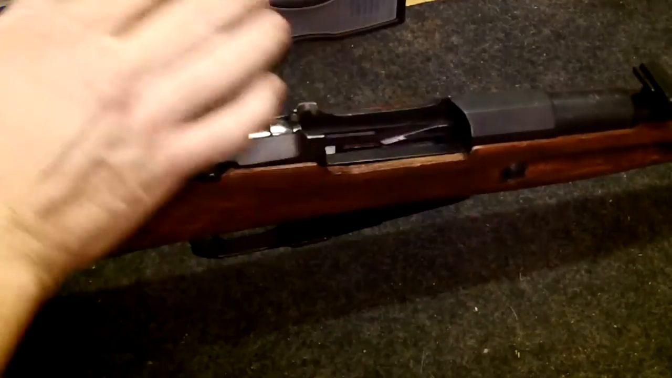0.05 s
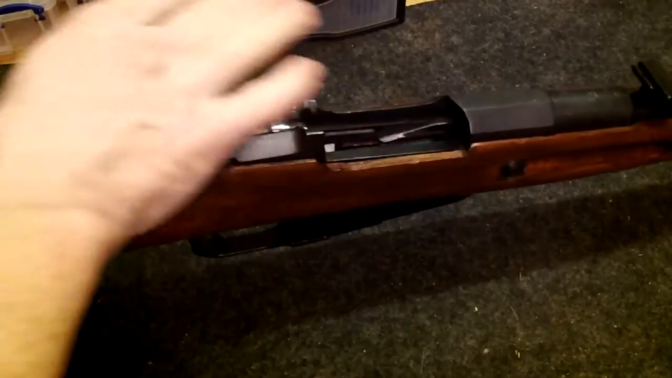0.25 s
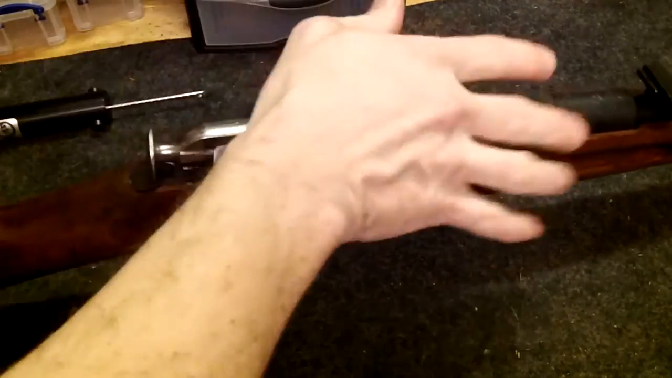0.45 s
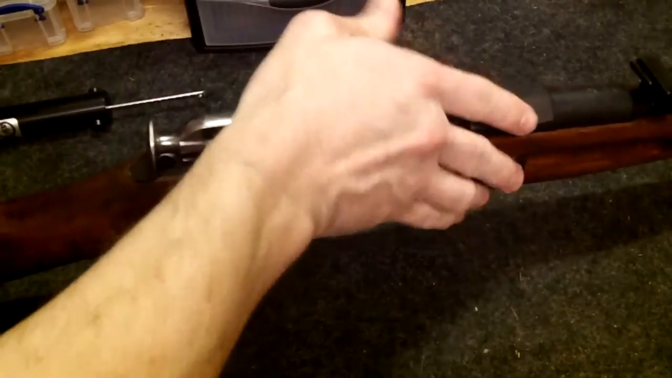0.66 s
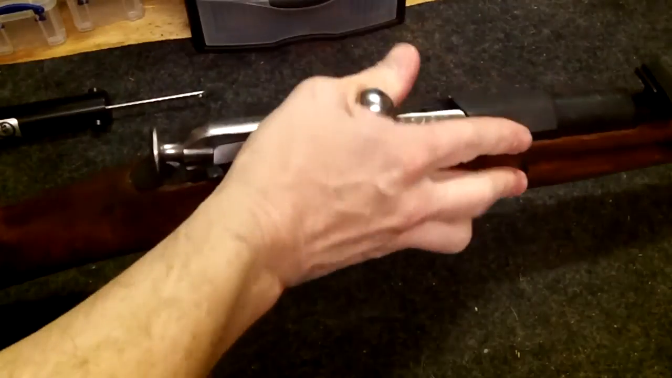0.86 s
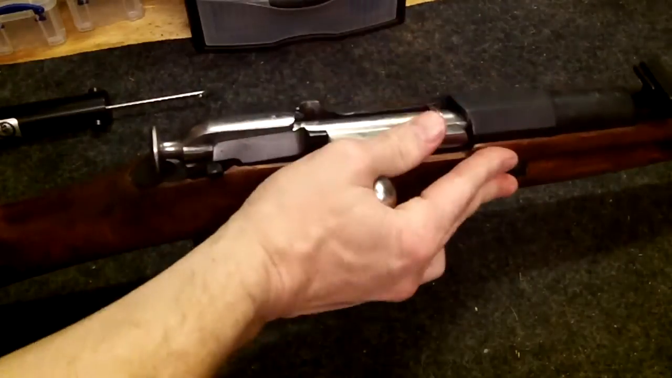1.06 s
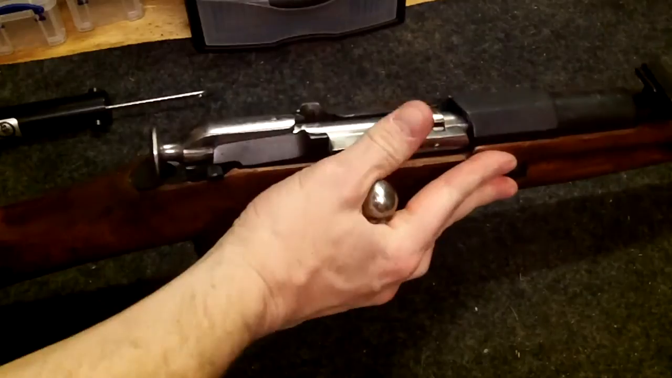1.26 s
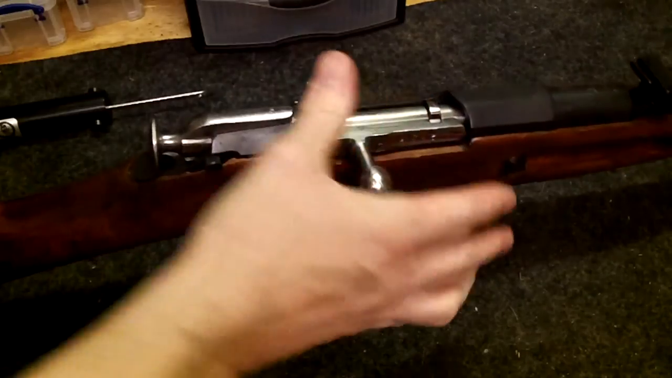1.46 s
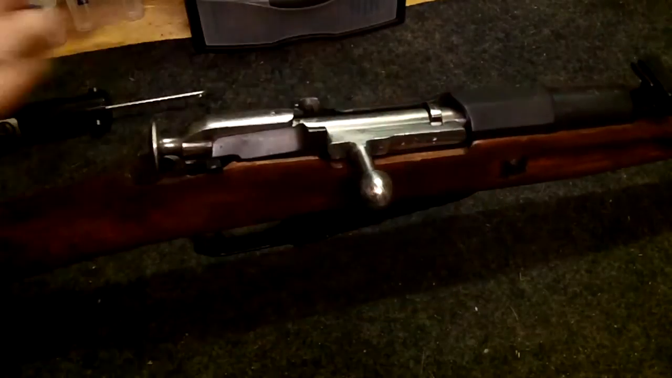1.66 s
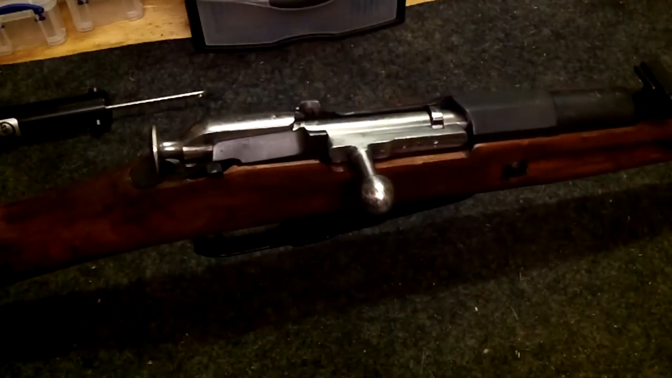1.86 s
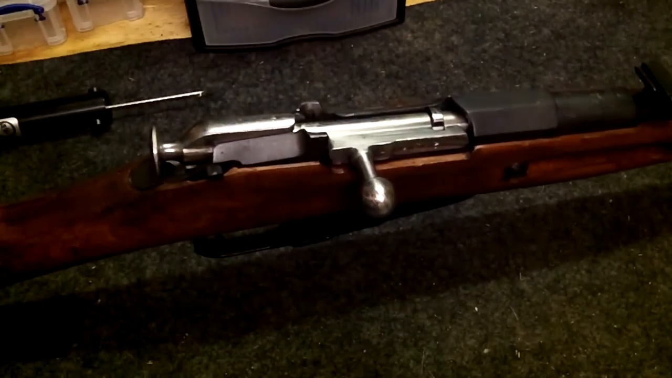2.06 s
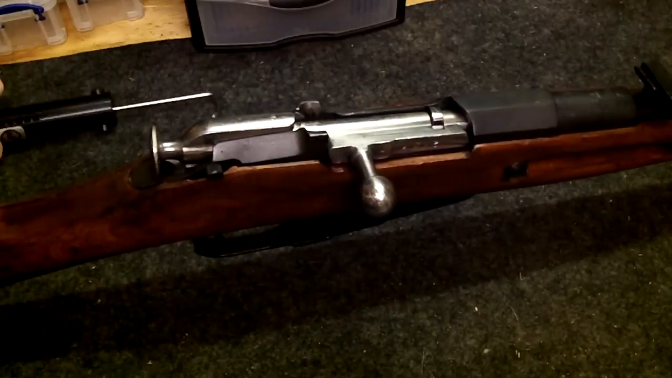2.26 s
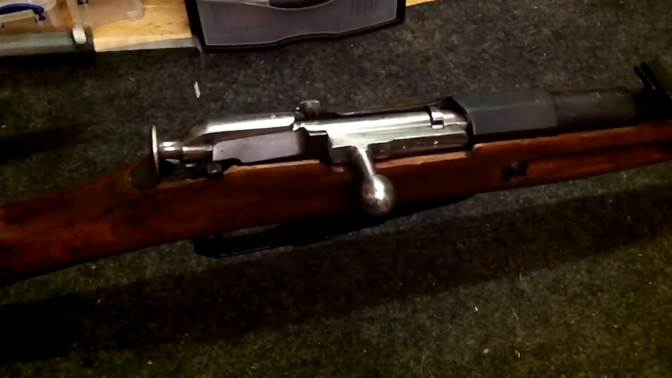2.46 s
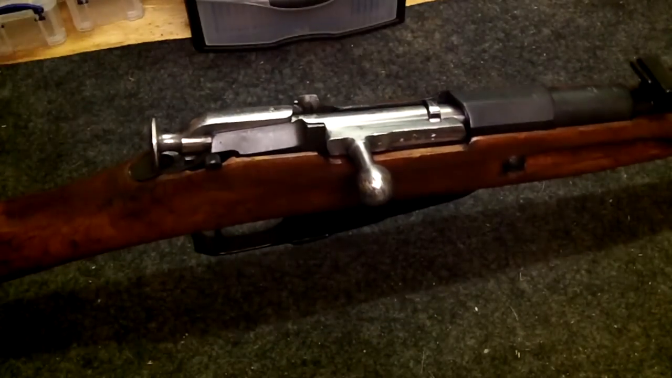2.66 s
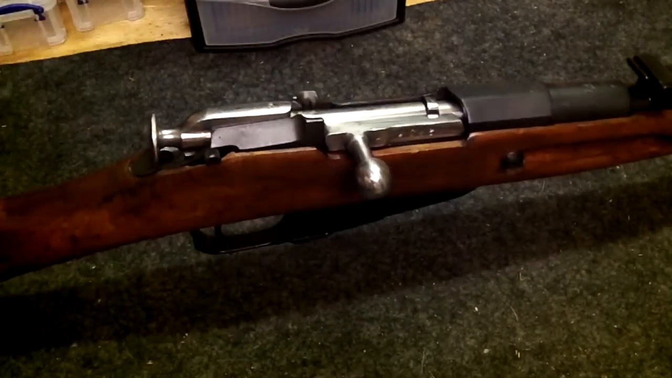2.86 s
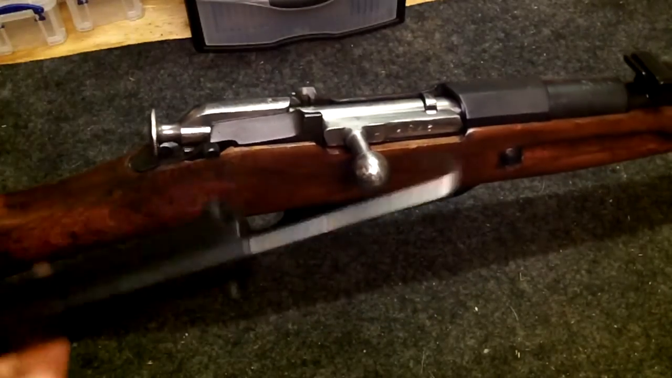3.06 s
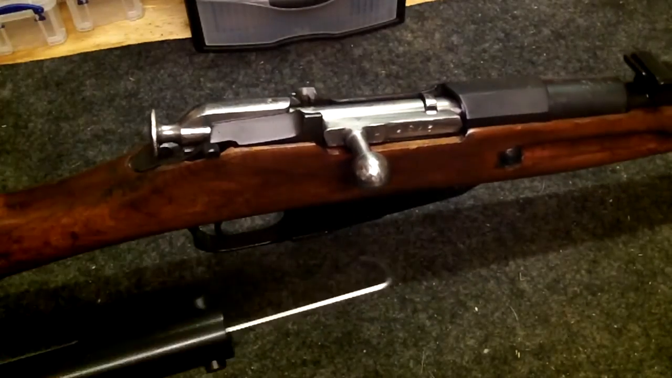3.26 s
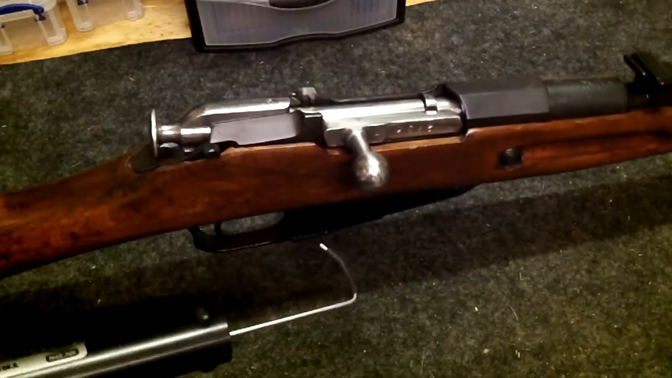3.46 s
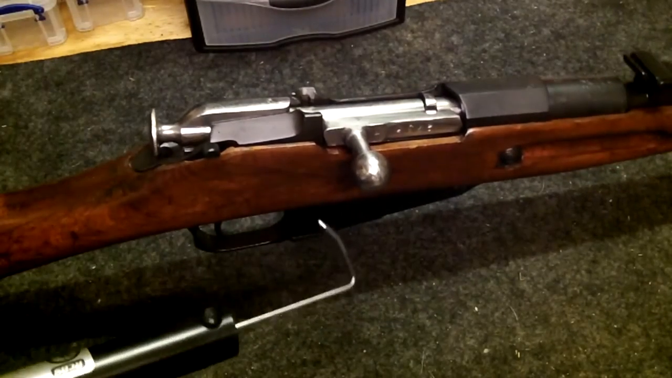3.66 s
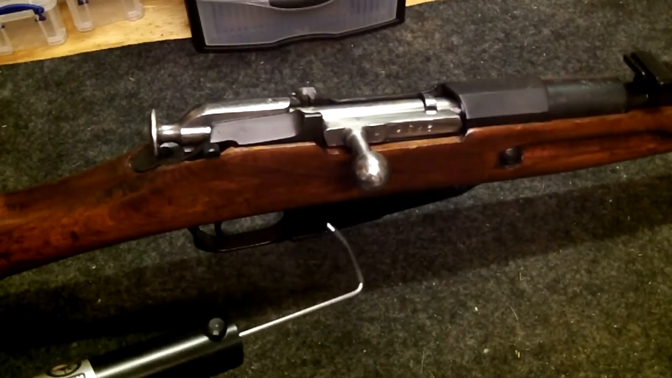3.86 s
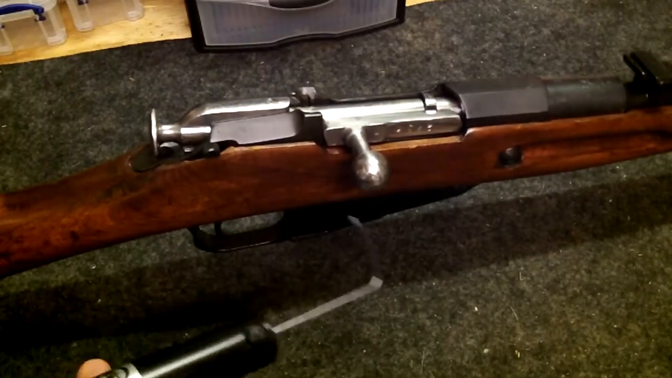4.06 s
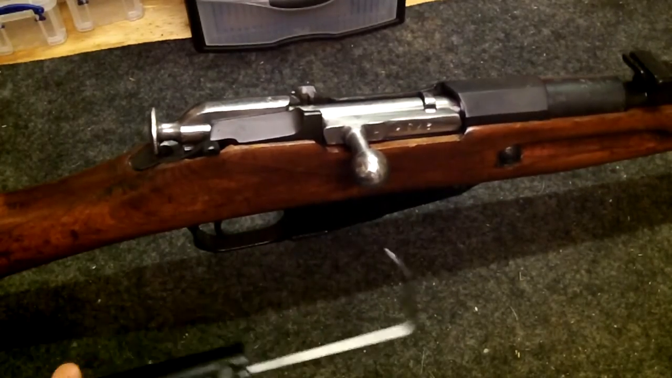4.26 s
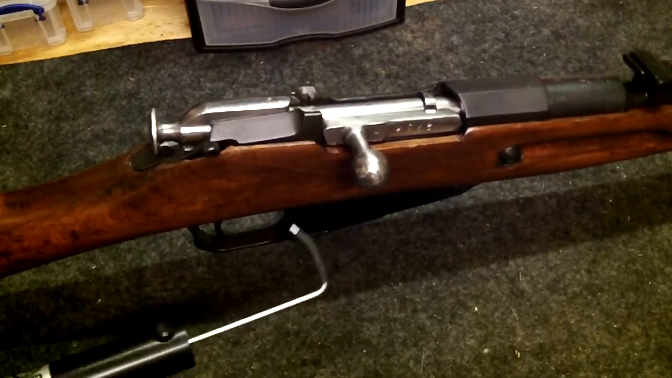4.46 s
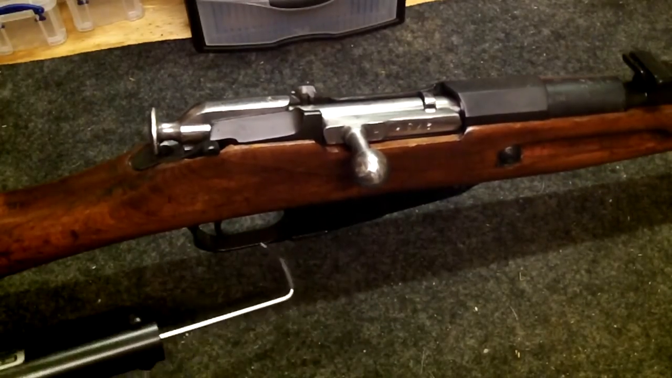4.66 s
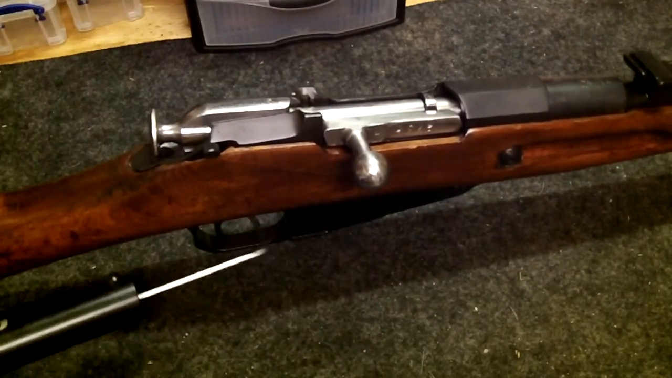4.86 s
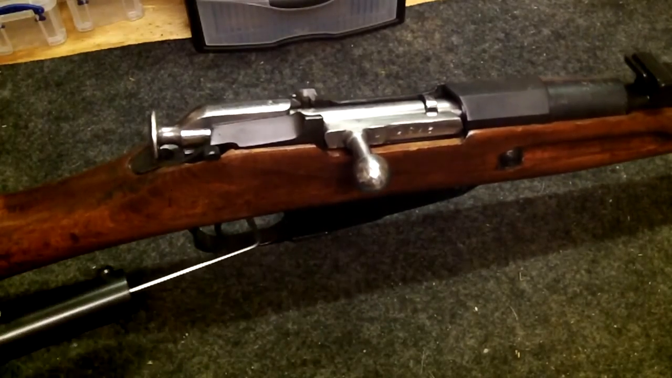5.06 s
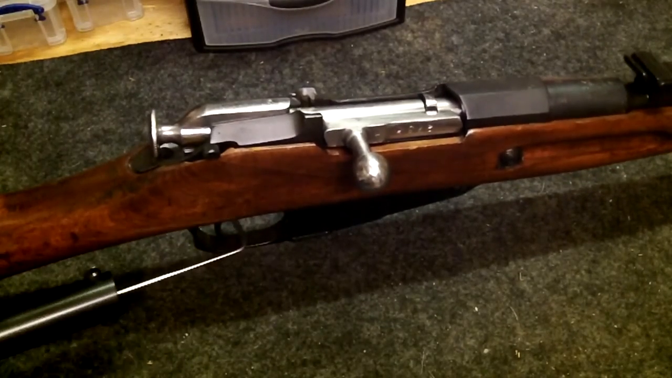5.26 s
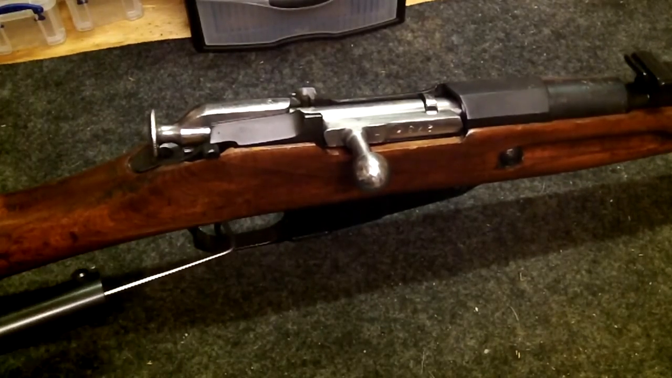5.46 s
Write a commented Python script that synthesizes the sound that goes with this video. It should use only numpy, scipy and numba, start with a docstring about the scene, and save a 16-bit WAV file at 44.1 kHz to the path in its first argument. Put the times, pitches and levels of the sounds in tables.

```python
"""Rifle bolt pushed home on a bench, small room

A small recorder sits close to a felt-covered bench while a rifle bolt is pushed home in strokes and turned down.
Steel scrapes as bunched ticks, and chatters and slams as noise cracks over ringing modes, thumping the wooden stock.
Then a trigger gauge: its slider knocks and bounces, and its wire hook rubs and taps the trigger guard.
The slams overload the recorder, whose limiter ducks and lets the room swell back over hiss and a low bench shudder."""
import sys
import numpy as np
from scipy import signal
from scipy.fft import rfft, irfft, next_fast_len
from scipy.io import wavfile
from numba import njit

SR = 44100
rng = np.random.default_rng(int(sys.argv[2]) if len(sys.argv) > 2 else 0)


def int16_out(signal):
    """Quantize to a 16-bit WAV file."""
    q = np.round(np.clip(np.atleast_2d(signal).T, -1, 1) * 32767)
    wavfile.write(sys.argv[1], SR, q.astype(np.int16))


N = 243431
TIME = np.arange(N) / SR
RING_TIME = TIME[:SR // 4]

# All event levels are relative, ahead of the recorder's limiter; pitch_hz is the pitch each contact favours.
# bolt slamming against a stop: start_s [s], level_db [dB], crack_t60_s [s], pitch_hz [Hz], focus_db [dB]
SLAMS = [(0.3788, -1.5, 0.018, 4020, 7), (0.508, 16, 0.039, 5400, 5), (0.78, 19.5, 0.024, 3930, 4.5),
         (1.0763, 0.5, 0.013, 3540, 14), (1.0997, 2, 0.017, 3740, 3.5)]
# loose bolt chattering against the receiver: start_s [s], level_db [dB], pitch_hz [Hz]
CHATTER = [(0.3228, -18.5, 2490), (0.355, -12.5, 2850), (0.3566, -16, 4150), (0.3634, -5, 5940),
           (0.3998, -14.5, 3400), (0.4199, -11, 2600), (0.4344, -13.5, 3500), (0.4398, -9, 3900),
           (.446, -7.5, 3800), (0.4548, -17, 3580), (0.4747, -11.5, 3330), (0.481, -16, 4200),
           (.725, -31.5, 3000), (.759, -22, 3120), (0.7689, -10, 2360), (1.034, -30, 2900),
           (1.041, -28, 2920), (1.051, -20.5, 2200), (1.438, -40, 2500)]
# hand moving the bolt along its raceway: start_s [s], end_s [s], level_db [dB]
BOLT_STROKES = [(0, .35, -51), (.355, .508, -27.5), (.757, .78, -20.5), (1.046, 1.1, -25.5)]
# stock jolted against the bench: start_s [s], level_db [dB], pitch_hz [Hz]
JOLTS = [(0.421, -43, 417), (0.471, -45, 200), (.51, -30, 178), (1.099, -37, 450)]
# gauge slider knocking in its tube: start_s [s], level_db [dB], pitch_hz [Hz], bounces [0 or 1]
SLIDER_KNOCKS = [(2.2505, -34.5, 2880, 0), (2.2845, -37, 2600, 0), (2.293, -20.5, 3380, 0),
                 (2.4397, -9.5, 4640, 1), (2.6557, -40, 4130, 0), (2.9031, -43, 4200, 0),
                 (3.0014, -46.5, 3470, 0), (3.6722, -32.5, 1690, 0)]
# wire hook tapping the trigger guard: start_s [s], level_db [dB], pitch_hz [Hz], bounces [0 or 1]
HOOK_TAPS = [(4.044, -37.5, 2940, 0), (4.1655, -21.5, 4400, 1), (4.296, -35.5, 3680, 0)]
# wire hook rubbing over the felt and the guard: start_s [s], end_s [s], level_db [dB]
HOOK_RUBS = [(3.71, 3.79, -52), (4.02, 4.05, -51), (4.13, 4.23, -46), (4.29, 4.36, -48.5),
             (4.43, 4.47, -50), (4.51, 4.55, -56)]

# ringing modes of each part: pitch_hz [Hz], level_db [dB], t60_s [s]
STEEL_MODES = [(952, -9.5, 0.049), (1233, -13.5, 0.046), (1400, -14, 0.094), (1785, -3.5, 0.038),
               (2627, -4.5, 0.048), (2930, -34, 0.036), (3180, -25, 0.16), (3640, 3, 0.0097),
               (4013, 3.5, 0.016), (4150, -22, 0.26), (4540, -2, 0.018), (4930, -32, 0.2),
               (4970, -13.5, 0.014), (5170, -47, 0.13), (5910, 0.5, 0.0077), (6650, -5, 0.0078)]
STOCK_MODES = [(146.3, -3, 0.1), (167, -11, 0.11), (237, -0.5, 0.15), (368, 3, 0.12), (413, 8.5, 0.049),
               (470, -16, 0.063), (616, -30, .03)]
GAUGE_MODES = [(1300, -12, 0.033), (2007, 7.5, 0.021), (2330, -1, 0.019), (2631, -11.5, 0.15),
               (3080, -6, 0.019), (3380, 4, 0.023), (3820, 3, 0.023), (4380, -2, .025), (5020, 2.5, 0.028),
               (5400, -2, 0.017), (5900, 6.5, 0.008), (6440, -8, 0.022), (6760, -9.5, 0.016),
               (10550, -9, 0.031)]
HOOK_MODES = [(2634, 0.5, 0.058), (3180, 2, 0.069), (3660, 9.5, 0.021), (3660, -28, 0.058),
              (3920, 3, 0.044), (6480, 9, 0.011)]

# crack of the bolt steel, and of the gauge and its hook: freq_hz [Hz], level_db [dB per Hz]
STEEL_CRACK = [(40, -38), (300, -7.5), (700, -9), (1100, -3), (2000, -4), (2800, -1.5), (4300, 0),
               (5500, -3.5), (6800, -8), (8500, -26), (11500, -14), (15000, -47.5)]
TUBE_CRACK = [(40, -23), (200, -14), (900, -9), (1500, 0), (2100, 5.5), (4000, -6.5), (6000, -2.5),
              (7000, -9), (8500, -18), (11000, -23), (15000, -39)]
# colour of the room's echo: freq_hz [Hz], level_db [dB]
ROOM_COLOUR = [(60, 12.5), (250, 0.5), (700, -2.5), (1300, -4), (2000, -2), (4200, -6), (7000, -5),
               (9000, -6), (15000, -11)]
# steady room air and microphone hiss: freq_hz [Hz], level_db [dB per Hz]
HISS_COLOUR = [(20, -4), (60, -1), (200, -1), (500, -1), (1000, -2), (2000, -4.5), (4200, -6), (5500, -9.5),
               (7000, -15), (9000, -14), (12000, -11.5), (15200, -14), (15700, -49)]

CHATTER_FOCUS_DB = 7
# crack length of a contact at 0 dB; it doubles for every GRAZE_DB softer
BOLT_T60_S, GAUGE_T60_S, GRAZE_DB = 0.016, 0.015, 22
# share of each steel blow that reaches the stock, and the pitch it favours there
STOCK_DB, STOCK_HZ = -34, 550
# a bounce comes back later, duller and grazing longer (ratios of pitch and of crack length)
BOUNCE_S, BOUNCE_PITCH_RATIO, BOUNCE_STRETCH = 0.018, 0.75, 2.07
# the palm presses the handle down and stays on it, shaking the bench
PALM_S, PALM_HOLD_S, PALM_DB = 0.96, 0.31, -52.5
# the recorder: a notch in the treble, the top of its range, and full scale before clipping
DEAD_BAND_HZ, TOP_HZ, CEILING = (7450, 8280), 16300, 0.92


def bolt_blows():
    """Slams and chatter crack through the steel and shake the stock, which also jolts against the bench."""
    out = np.zeros(N)
    chatter = [(s, db, contact_t60(db, BOLT_T60_S), hz, CHATTER_FOCUS_DB) for s, db, hz in CHATTER]
    for start_s, level_db, t60, pitch_hz, focus_db in SLAMS + chatter:
        steel = strike(STEEL_CRACK, STEEL_MODES, t60, modes_db=-7.5, extra_db=focus(pitch_hz, focus_db))
        stock = ring(STOCK_MODES, focus(STOCK_HZ, depth_db=4))
        thump = undb(STOCK_DB) * np.std(steel) * stock
        add(out, start_s, undb(level_db) * (steel + thump))
    for start_s, level_db, pitch_hz in JOLTS:
        add(out, start_s, undb(level_db) * ring(STOCK_MODES, focus(pitch_hz, depth_db=8)))
    return out


def bolt_slide(stock_db=-12):
    """The bolt scrapes along its raceway, ringing the receiver and the stock."""
    ringing = ring(STEEL_MODES) + undb(stock_db) * ring(STOCK_MODES)
    pressure = strokes(BOLT_STROKES, attack_s=0.018, release_t60=0.059)
    return pressure * scrape(STEEL_CRACK, ringing, ticks_per_s=4000, grain_db=3.5, modes_db=2.0)


def gauge_taps(rows, modes, modes_db, focus_db, bounce_db):
    """Contacts of the gauge's metal parts; marked ones fall back once, softer, duller and longer."""
    out = np.zeros(N)
    for start_s, level_db, pitch_hz, bounces in rows:
        t60 = contact_t60(level_db, GAUGE_T60_S)
        knock = strike(TUBE_CRACK, modes, t60, modes_db, focus(pitch_hz, focus_db))
        add(out, start_s, undb(level_db) * knock)
        if bounces:
            soft_db = level_db + bounce_db
            t60 = BOUNCE_STRETCH * contact_t60(soft_db, GAUGE_T60_S)
            duller = focus(pitch_hz * BOUNCE_PITCH_RATIO, focus_db)
            bounce = strike(TUBE_CRACK, modes, t60, modes_db, duller)
            add(out, start_s + BOUNCE_S, undb(soft_db) * bounce)
    return out


def hook_drag():
    """The dragged wire catches and slips in tiny ticks, whispering at its own resonances."""
    whisper = [(1500, -25), (2400, -12), (3100, 6), (3800, -9), (4600, -26), (9000, -20)]
    ringing = ring(HOOK_MODES, focus(2800, depth_db=7))
    pressure = strokes(HOOK_RUBS, attack_s=0.011, release_t60=0.26)
    return pressure * scrape(whisper, ringing, ticks_per_s=2200, grain_db=1.5, modes_db=-2.0)


def room(x, t60, build_s=0.018):
    """Echoes of a small room, as coloured noise, thicken over the first milliseconds and die away."""
    t = TIME[:SR // 2]
    decay = fade(t60, t)
    build = np.minimum(t / build_s, 1) ** 2
    tail = colour(rng.standard_normal(len(t)), ROOM_COLOUR) * decay * build
    return signal.oaconvolve(x, tail / np.linalg.norm(decay))[:N]


def background(hiss_db=-47.5):
    """Steady room air and microphone hiss, with the low shudder of the bench under the palm."""
    hiss = unit(colour(rng.standard_normal(N), HISS_COLOUR))
    low_band = [(10, -31), (28, -3), (60, -19), (200, -33), (1000, -61)]
    shudder = unit(colour(rng.standard_normal(N), low_band))
    palm = strokes([(PALM_S, PALM_S + PALM_HOLD_S, PALM_DB)], attack_s=0.024, release_t60=1.3)
    return undb(hiss_db) * hiss + palm * shudder


def strike(spectrum, modes, t60, modes_db, extra_db, rise_s=0.00037):
    """A metal contact: a dense crack that builds as the parts press together, plus ringing modes."""
    rise = 1 - np.exp(-RING_TIME / rise_s)
    noise = rng.standard_normal(len(RING_TIME)) * fade(t60) * rise
    crack = unit(colour(noise, spectrum, extra_db))
    ringing = unit(ring(modes, extra_db) * rise)
    # a longer contact carries more energy
    return unit(crack + undb(modes_db) * ringing) * np.sqrt(np.mean(fade(t60) ** 2))


def ring(modes, extra_db=np.zeros_like, scatter_db=2):
    """Decaying modes, rms 1; every contact point weights them a little differently."""
    hz, db, t60 = np.transpose(modes)
    scatter = scatter_db * rng.standard_normal(len(hz))
    gains = undb(db + extra_db(hz) + scatter) * rng.choice([-1, 1], len(hz))
    return unit(sum(g * fade(d) * np.sin(2 * np.pi * f * RING_TIME) for f, g, d in zip(hz, gains, t60)))


def scrape(spectrum, ringing, ticks_per_s, grain_db, modes_db):
    """A rub catches and slips in bunches of tiny ticks, each cracking and ringing the part; rms 1."""
    bunch_band = [(10, 4), (60, 22), (200, -31), (600, -16), (2000, -46)]
    bunches = unit(colour(rng.standard_normal(N), bunch_band))
    ticks = (rng.random(N) < ticks_per_s / SR) * rng.standard_normal(N)
    slips = ticks * undb(grain_db * bunches)
    crack = colour(signal.unit_impulse(len(ringing)), spectrum)
    one_tick = unit(crack) + undb(modes_db) * unit(ringing)
    return unit(signal.fftconvolve(slips, one_tick)[:N])


def strokes(rows, attack_s, release_t60):
    """Gain over time of hand movements (start_s, end_s, level_db): each builds up, holds and dies away."""
    gain = np.zeros(N)
    for start_s, end_s, level_db in rows:
        build = 1 - np.exp(-np.maximum(TIME - start_s, 0) / attack_s)
        gain += undb(level_db) * build * fade(release_t60, np.maximum(TIME - end_s, 0))
    return gain


def contact_t60(db, firm_t60):
    """The lighter the contact, the longer it grazes."""
    return firm_t60 * 2 ** (-db / GRAZE_DB)


def focus(hz, depth_db):
    """Where a part is hit favours pitches near hz: depth_db down an octave away, at most twice that."""
    return lambda f: -depth_db * np.minimum(np.log2(f / hz) ** 2, 2)


def colour(x, points, extra_db=np.zeros_like):
    """Causal minimum-phase filter from (Hz, dB) points, plus any extra dB as a function of frequency."""
    size = 2 * next_fast_len(len(x) // 2 + 1)
    f = np.maximum(np.arange(size // 2 + 1) * SR / size, 1)
    hz, db = np.transpose(points)
    gain = undb(np.interp(np.log(f), np.log(hz), db) + extra_db(f))
    # folding the cepstrum onto positive times makes the filter causal
    cepstrum = irfft(np.log(gain))
    cepstrum[1:size // 2] *= 2
    cepstrum[size // 2 + 1:] = 0
    return irfft(rfft(x, size) * np.exp(rfft(cepstrum)), size)[:len(x)]


def fade(t60, t=RING_TIME):
    """Exponential decay, 60 dB down after t60 seconds."""
    return np.exp(-np.log(1000) * t / max(t60, 1e-3))


def undb(db):
    """Decibels to gain."""
    return 10 ** (np.asarray(db) / 20)


def unit(x):
    """Scale to rms 1."""
    return x / np.sqrt(np.mean(x ** 2))


def add(track, s, sound):
    """Mix a sound into the track at s seconds."""
    start = int(s * SR)
    track[start:start + len(sound)] += sound[:N - start]


def scene(wall_db=-10, gauge_room_db=-3.5):
    """Rifle and gauge in one room; the rifle's modes mix differently towards microphone and walls."""
    slide = bolt_slide()
    ahead = bolt_blows() + slide
    aside = bolt_blows() + slide
    rifle = ahead + undb(wall_db) * (room(ahead, t60=0.32) + room(aside, t60=0.32))
    # the gauge's ringing modes are set louder than its crack, so its clicks sound pitched
    slider = gauge_taps(SLIDER_KNOCKS, GAUGE_MODES, modes_db=3.5, focus_db=4.5, bounce_db=-5.5)
    hook = gauge_taps(HOOK_TAPS, HOOK_MODES, modes_db=4.0, focus_db=8, bounce_db=-18)
    gauge = slider + hook + hook_drag()
    mix = rifle + gauge + undb(gauge_room_db) * room(gauge, t60=0.2) + background()
    return mix[None]


@njit
def ducking(over_db, attack, release):
    """Gain reduction in dB: it climbs towards the overshoot, then lets go at a steady rate."""
    out, cut = np.empty(len(over_db)), 0.
    for i in range(len(over_db)):
        if over_db[i] > cut:
            cut += attack * (over_db[i] - cut)
        else:
            cut = max(cut - release, 0.)
        out[i] = cut
    return out


def record(dry, threshold_db=-11, attack_s=0.0024, release_db_per_s=115, window_s=0.004, lopsided=0.18):
    """A dead band near 8 kHz, a limiter too slow for the first milliseconds, clipping, and a cut-off top."""
    x = signal.sosfilt(signal.butter(4, DEAD_BAND_HZ, "bandstop", fs=SR, output="sos"), dry[0])
    keep = np.exp(-1 / (window_s * SR))
    power = signal.lfilter([1 - keep], [1, -keep], x ** 2) + 1e-12
    over_db = 10 * np.log10(power) - threshold_db
    x = x * undb(-ducking(over_db, 1 / (attack_s * SR), release_db_per_s / SR))
    # one polarity overloads earlier, which adds a low knock to the slams
    clipped = np.clip(x, -CEILING, CEILING * (1 - lopsided))
    top_cut = signal.ellip(8, 0.2, 70, TOP_HZ, fs=SR, output="sos")
    return signal.sosfilt(top_cut, clipped)[None]


dry = scene()
out = record(dry)
int16_out(out)
```